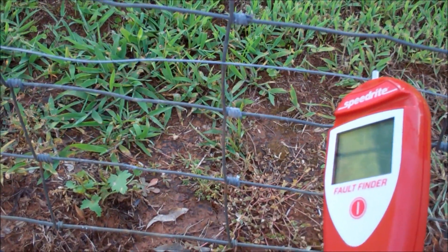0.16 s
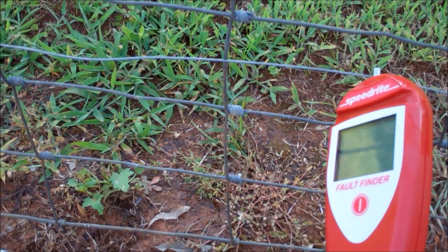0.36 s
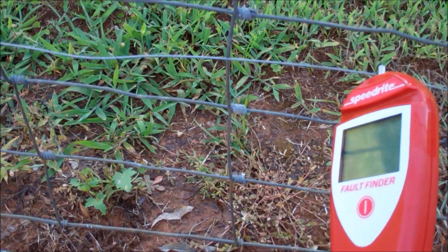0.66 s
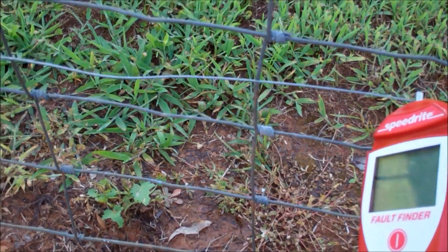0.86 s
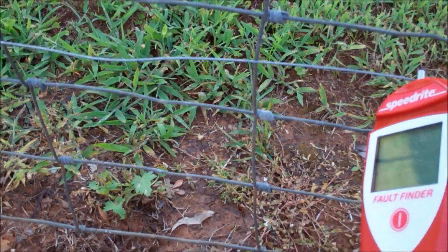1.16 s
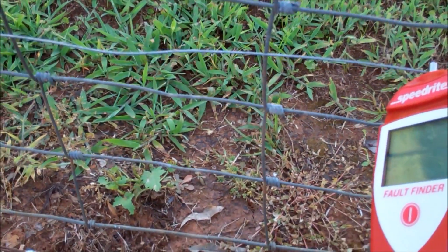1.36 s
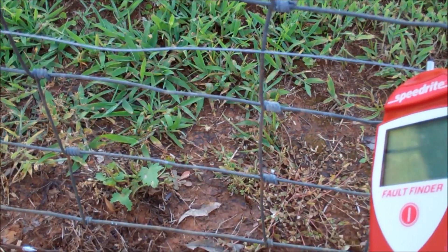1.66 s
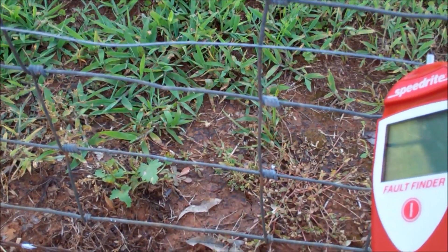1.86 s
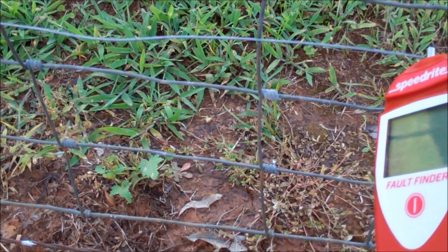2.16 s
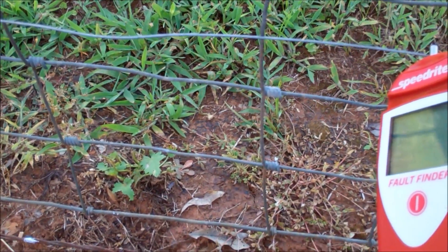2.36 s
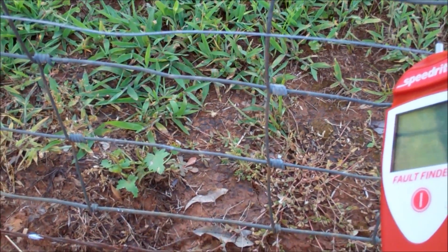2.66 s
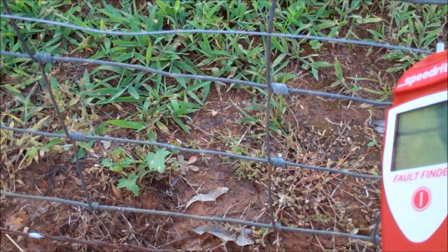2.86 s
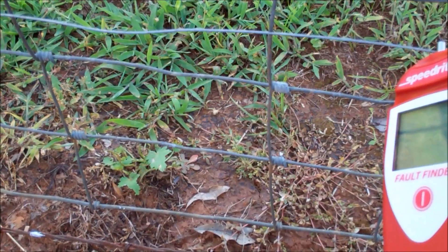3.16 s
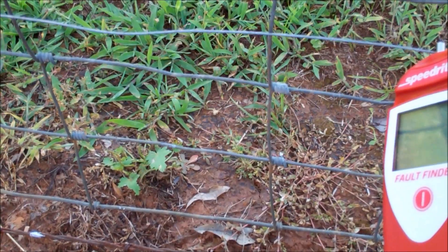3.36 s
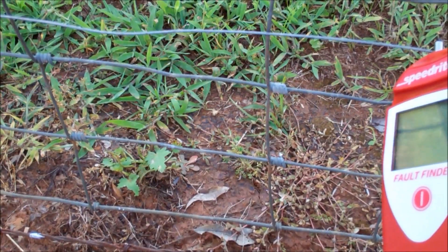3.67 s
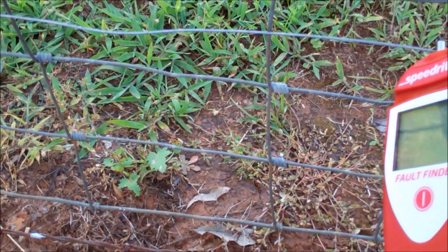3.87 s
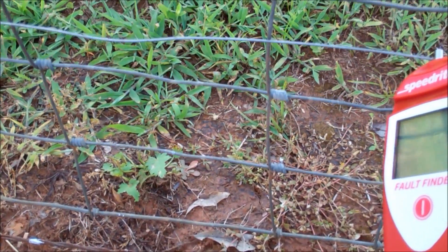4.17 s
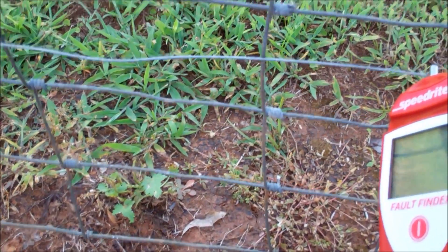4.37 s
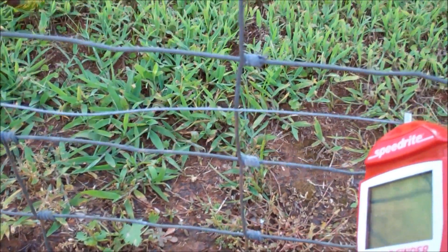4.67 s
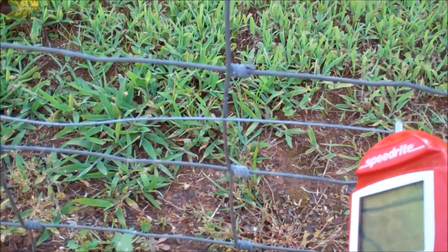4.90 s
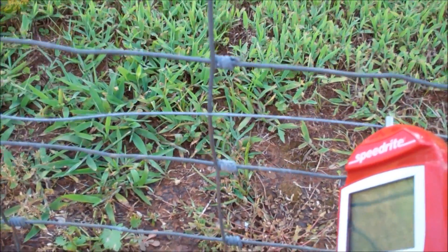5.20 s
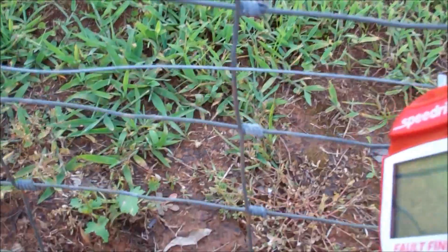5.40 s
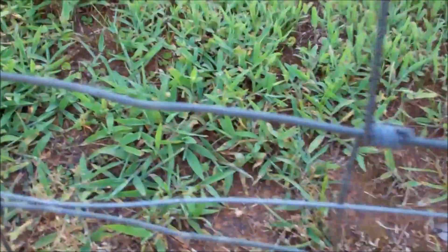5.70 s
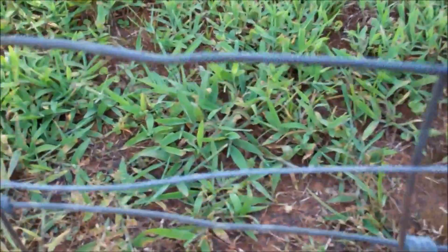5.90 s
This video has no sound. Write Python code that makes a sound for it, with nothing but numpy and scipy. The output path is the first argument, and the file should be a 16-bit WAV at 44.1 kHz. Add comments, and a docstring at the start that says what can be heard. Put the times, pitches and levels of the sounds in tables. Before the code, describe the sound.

In a grassy field, a nearby katydid keeps up a thin, very high trill among pulsing insect rasps and a soft hum of distant traffic. Four evenly spaced electric snaps from a wire fence cut through, the third and fourth jolting the hand-held microphone with a hard pop. From about two seconds in, a distant bird whistles hoarse, falling notes, and a few light clicks follow the last snap.

```python
"""A sharp electric crack over a trilling katydid: a fence sparks about every second and a half in a meadow
at dusk. Two pulses only crack; two also jolt the hand-held microphone's electronics, and the gain control
ducks. The katydid, close by, rubs a high tone from its wings, and other insects rasp with theirs.
Far off, a bird gives hoarse falling whistles over an insect chorus and the hum of traffic."""
import sys
import numpy as np
from scipy import signal
from scipy.fft import rfft, irfft, next_fast_len
from scipy.io import wavfile
from scipy.ndimage import uniform_filter1d, minimum_filter1d

SR = 44100
rng = np.random.default_rng(int(sys.argv[2]) if len(sys.argv) > 2 else 0)


def dump(signal):
    """Clip the signal to [-1, 1] and save it as 16-bit WAV at the path in sys.argv[1]."""
    limited = np.clip(np.atleast_2d(signal).T, -1, 1)
    pcm = np.round(limited * 32767).astype(np.int16)
    wavfile.write(sys.argv[1], SR, pcm)


N = 266431

# The colour of a crack at the microphone. Each row: frequency in Hz, relative level in dB.
CRACK_SPECTRUM = [(300, -36), (800, -30), (1470, -19), (1970, -11), (3330, -12), (4800, -8), (6310, -6),
                  (8000, -6), (10500, 0), (13800, -1), (15000, -16)]
# Sparks on the fence. Each row: start in seconds, left and right level in dB, ground echo in dB,
# lift below 3 kHz in dB.
SPARKS = [(0.2556, -9, -11, 1, -1), (1.8347, -9, -11.5, -15, 1), (3.4140, 0, -5, -5.5, -0.5),
          (4.9932, -4.5, -5, -3.5, 4.5)]
def fence_cracks(decay_ms=0.4, echo_ms=1.7, scatter_ms=2.6, sizzle_ms=18):
    """Each spark is a short noise burst with a ground echo, a scattered tail and a faint sizzle."""
    cracks, size = np.zeros((2, N)), 2048
    ms, hz = np.arange(size) * 1000 / SR, np.fft.rfftfreq(size, 1 / SR)
    burst = np.exp(-ms / decay_ms)
    echo = np.roll(burst ** 2, int(echo_ms * SR / 1000))
    scatter = from_db(-12) * np.exp(-ms / scatter_ms)
    for start, left_db, right_db, echo_db, bass_db in SPARKS:
        fade = burst + from_db(echo_db) * echo + scatter
        hiss = unit_rms(band(rng.standard_normal((2, size)), hz=4900, width_hz=7000))
        sizzle = from_db(-29.5) * hiss * np.exp(-ms / sizzle_ms)
        colour = from_db(at_hz(CRACK_SPECTRUM, hz) + bass_db * (hz < 3000))
        noise = unit_rms(irfft(rfft(rng.standard_normal((2, size))) * colour, size))
        i = round(start * SR)
        cracks[:, i:i + size] += from_db([[left_db], [right_db]]) * (noise * fade + sizzle)
    return signal.sosfilt(signal.cheby2(6, 25, 14700, fs=SR, output="sos"), cracks)


# Fence pulses that get into the microphone's electronics. Each row: start in seconds, channel (0 is left),
# level in dB, length in ms, fall in ms, relative back swing, recovery in ms, share that recovers slowly.
JOLTS = [(3.41394, 0, 1.5, .82, .45, 1.05, 1.0, .2), (3.41422, 1, 5, .84, .35, 0.42, 1.5, .24),
         (4.99312, 0, -4, .96, .47, 1.05, 1.1, .17), (4.99335, 1, -13, 1.0, .45, 0.25, 1.9, .8)]
def preamp_jolts(hold_ms=0.9, slow_ms=7.0, dip_ms=0.28):
    """The fence current kicks the preamplifier one way; it swings back, holds and recovers."""
    jolts = np.zeros((2, N))
    for start, channel, level_db, length_ms, fall_ms, swing, recovery_ms, slow in JOLTS:
        since_ms = (np.arange(N) / SR - start) * 1000
        fall = np.clip((since_ms - length_ms) / fall_ms + .5, 0, 1)
        pulse = (since_ms >= 0) * (1 - fall)
        after_ms = np.maximum(since_ms - length_ms - hold_ms, 0)
        recovery = (1 - slow) * np.exp(-after_ms / recovery_ms) + slow * np.exp(-after_ms / slow_ms)
        dip = 0.4 * (since_ms < 0) * (since_ms > -dip_ms) * (channel == 1)   # the right side dips first
        jolts[round(channel)] += from_db(level_db) * (pulse - swing * fall * recovery - dip)
    return jolts


def fence(rail=0.97):
    """Cracks and jolts together saturate softly at the preamplifier's rails."""
    return rail * np.tanh((fence_cracks() + preamp_jolts()) / rail)


# The katydid close by, as the hand turns the microphone. Each row: time in seconds, level in dB,
# left over right in dB, ground echo in dB, lag at the left port in ms.
KATYDID_AT_MIC = [(0, -29.5, 1, -13, .12), (.6, -31, .5, -8, 0.11), (.95, -27, 2, -11, .13),
                  (1.2, -30, 3.5, -13.5, 0.12), (1.7, -31.5, 2.5, -9.5, 0.13), (2.1, -30.5, 0, -7, 0.12),
                  (3.2, -29.5, 1, -7, 0.12), (4.2, -30.5, 0.2, -7, 0.12), (4.9, -27.5, 0, -20, 0.12),
                  (5.03, -29, -2.5, -18.5, 0.11), (5.4, -29, 1, -13, 0.12), (5.7, -28.5, 0.5, -13, 0.13),
                  (6.1, -28.5, 1, -15, 0.13)]
# One wing stroke. Each row: time from its middle in ms, pitch in Hz, relative level in dB.
WING_STROKE = [(-4.2, 10500, -30), (-3, 10640, -6), (-1.8, 10830, -1), (-.3, 11080, 0), (.8, 11190, 0),
               (2.1, 11030, -1), (3, 10720, -4), (3.9, 10250, -9), (4.8, 9750, -14), (5.8, 9400, -30)]
# The strokes slip slowly behind the beat. Each row: time in seconds, lateness in ms.
STROKE_LATENESS = [(0, -.2), (2.6, 0), (6.1, 2.2)]
def katydid(strokes_per_s=75.235, first_stroke_s=.00711):
    """A tone that arches up and down in every wing stroke, heard directly and off the ground."""
    level_db, pan_db, echo_db, lag_ms = in_time(KATYDID_AT_MIC)
    late_s = in_time(STROKE_LATENESS)[0] / 1000
    strokes = (np.arange(N) / SR - late_s - first_stroke_s) * strokes_per_s
    ms = (strokes - np.round(strokes)) * 1000 / strokes_per_s
    knot_ms, pitch, shape_db = np.transpose(WING_STROKE)
    hz = np.interp(ms, knot_ms, pitch) + 12 * drift(5.7) + 31.8 * drift(300)
    gain = from_db(level_db + np.interp(ms, knot_ms, shape_db) + 0.77 * drift(75) + 0.76 * drift(390))
    phase = 2 * np.pi * np.cumsum(hz) / SR
    song = gain * np.sin(phase)
    lagged = gain * np.sin(phase - 2 * np.pi * hz * lag_ms / 1000)
    left = lagged + from_db(echo_db) * delayed(song, ms=3.887)
    right = song + from_db(echo_db) * delayed(song, ms=3.2)
    return np.array([left * from_db(pan_db / 2), right * from_db(-pan_db / 2)])


def rasps(times, length_ms, level_db, hz, width_hz, pan_db, alike, tail, sag_hz):
    """Bursts of dense tooth clicks ring in a wing resonance, each at its own strength, sagging in pitch."""
    t, gain, shift_hz = np.arange(N) / SR, np.zeros(N), np.zeros(N)
    for middle, rasp_db in zip(times, level_db + 1.6 * rng.standard_normal(len(times))):
        near = slice(max(0, int((middle - .2) * SR)), int((middle + .3) * SR))
        x = (t[near] - middle) * 2000 / length_ms   # -1 to 1 across the rasp
        gain[near] += from_db(rasp_db) * np.where(x < 0, np.exp(-x ** 4), np.exp(-np.abs(x) ** tail))
        shift_hz[near] -= sag_hz / 2 * x * (np.abs(x) < 1.5)
    shared, *per_side = rng.standard_normal((3, N)) * (rng.random((3, N)) < .1)
    teeth = np.sqrt(alike) * shared + np.sqrt(1 - alike) * np.array(per_side)
    ring = signal.hilbert(band(band(teeth, hz, width_hz), hz, width_hz), next_fast_len(N))[:, :N]
    sagging = np.real(ring * np.exp(2j * np.pi * np.cumsum(shift_hz) / SR))
    return gain * unit_rms(sagging) * from_db([[pan_db / 2], [-pan_db / 2]])


# A low rasper in the centre, long and uneven in pace. Each entry: middle of a rasp in seconds.
LOW_RASPS = [.085, .31, .499, .659, .828, 1.048, 1.227, 1.452, 1.616, 1.786, 1.946, 2.126, 2.29, 2.464,
             2.614, 2.878, 3.038, 3.223, 3.542, 3.751, 3.941, 4.19, 4.37, 4.53, 4.689, 4.879, 5.074, 5.278,
             5.493, 5.682, 5.917]
# A high rasper a little to the right, nearly even in pace. Each row: time in seconds, rasps so far.
HIGH_RASP_COUNT = [(.07, 0), (.63, 4), (1.83, 13), (2.105, 15), (2.9, 21), (3.335, 24), (3.75, 27),
                   (4.19, 30), (4.6, 33), (5.045, 36), (5.445, 39), (6.02, 43)]
# A short rasper joins on the right, about nine a second. Each entry: middle of a rasp in seconds.
SHORT_RASPS = [1.507, 1.615, 1.716, 1.95, 2.095, 2.205, 2.355, 2.461, 2.57, 2.669, 2.764, 2.864, 3.138,
               3.245, 3.345, 3.63, 3.75, 3.972, 4.085, 4.21, 4.405, 4.518, 4.63, 4.74, 4.85, 4.974, 5.265,
               5.4, 5.525, 5.71, 5.93, 6.026]
# A scratchy chirp further off. Each row: middle in seconds, level in dB.
FAR_CHIRPS = [(1.14, -54.5), (1.72, -51), (2.33, -56), (2.52, -64), (3.02, -49), (3.64, -51), (5.51, -54)]
def rasping_insects():
    """Four insects scrape their wings, each with its own pace and resonance."""
    knot_s, count = np.transpose(HIGH_RASP_COUNT)
    high_s = np.interp(np.arange(count[-1] + 1), count, knot_s)
    chirp_s, chirp_db = np.transpose(FAR_CHIRPS)
    low = rasps(LOW_RASPS, length_ms=52, level_db=-46.5, hz=9380, width_hz=730,
                pan_db=0, alike=0.065, tail=2.5, sag_hz=597)
    high = rasps(high_s, length_ms=36.3, level_db=-42.5, hz=10000, width_hz=520,
                 pan_db=-2, alike=0.32, tail=3.3, sag_hz=149)
    short = rasps(SHORT_RASPS, length_ms=20.8, level_db=-40.5, hz=9760, width_hz=610,
                  pan_db=-3, alike=0.22, tail=2.9, sag_hz=300)
    chirps = rasps(chirp_s, length_ms=90, level_db=chirp_db, hz=7260, width_hz=2300,
                   pan_db=-1, alike=0.19, tail=1.0, sag_hz=99)
    return low + high + short + chirps


# A bird far from the microphone. Each row: start in seconds, level in dB, length in seconds,
# first and last pitch in Hz.
BIRD_CALLS = [(2.166, -55, .42, 2950, 2790), (3.79, -50.5, 0.39, 3090, 2735),
              (4.444, -51, 0.41, 3035, 2830), (5.239, -49, 0.42, 3000, 2860)]
def bird():
    """Falling whistles with a weak octave, roughened by a flutter."""
    calls = np.zeros(N)
    flutter = from_db(5 * drift(150) + 3 * drift(30))
    waver_hz = 50 * drift(390) + 14 * drift(40)
    for start, level_db, length_s, from_hz, to_hz in BIRD_CALLS:
        progress = np.clip((np.arange(N) / SR - start) / length_s, 0, 1)
        phase = 2 * np.pi * np.cumsum(from_hz + (to_hz - from_hz) * progress ** 2 + waver_hz) / SR
        whistle = np.sin(phase) + from_db(-14) * np.sin(2 * phase)
        calls += from_db(level_db) * np.sin(np.pi * progress ** 0.6) * whistle * flutter
    return np.array([calls, delayed(calls, ms=0.12)])


# Hand and grass at the microphone. Each row: start in seconds, level in dB, centre in Hz, width in Hz.
HANDLING_TICKS = [(4.441, -38.5, 249, 300), (5.517, -24, 10000, 5990), (5.646, -31, 12000, 4000),
                  (5.809, -27.5, 2550, 3040)]
def ticks():
    """Single small clicks, each ringing in its own band."""
    out = np.zeros(N)
    for start, level_db, hz, width_hz in HANDLING_TICKS:
        click = band(signal.unit_impulse(1500), hz, width_hz)
        i = round(start * SR)
        out[i:i + len(click)] -= from_db(level_db) * click / np.abs(click).max()
    return out


# One thin insect tone far off, fading away. Each row: time in seconds, level in dB.
THIN_TONE_FADE = [(0, -67), (.6, -68), (.95, -71), (1.3, -90), (6.1, -95)]
def thin_insect(hz=7760, width_hz=240):
    """Noise rings in a narrow wing resonance."""
    ring = band(band(rng.standard_normal((2, N)), hz, width_hz), hz, width_hz)
    return from_db(in_time(THIN_TONE_FADE)[0]) * unit_rms(ring)


# Insects far across the meadow. Each row: frequency in Hz, relative level in dB.
CHORUS_SPECTRUM = [(6000, -33), (8300, -20), (9500, -4), (10300, -7), (11000, -5), (11400, -4),
                   (11700, -13), (11950, -10), (13000, -8), (13700, -4), (14170, -1), (14230, -26),
                   (14450, -60), (16000, -60)]
def insect_chorus():
    """Many far insects blur into a high, slightly wavering hiss."""
    return from_db(-45 + 0.92 * drift(11)) * ambience(CHORUS_SPECTRUM)


# Traffic and leaves in the distance. Each row: time in seconds, level in dB.
TRAFFIC_LEVEL = [(0, -48), (.7, -49), (3.2, -51), (4.7, -50), (6.1, -51)]
# Their colour at the microphone. Each row: frequency in Hz, relative level in dB.
TRAFFIC_SPECTRUM = [(15, -38.5), (25, -23), (95, -4), (112, -4.5), (122, 2), (133, -6), (364, -17.5),
                    (650, -19), (953, -14.5), (1150, -13), (1900, -14), (2370, -16.5), (3540, -18.5),
                    (6210, -21.5), (8000, -19), (14200, -41.5), (14450, -81.5)]
def traffic_and_leaves():
    """Distant traffic and leaves merge into a low hum under a soft hiss."""
    return from_db(in_time(TRAFFIC_LEVEL)[0] + drift(8)) * ambience(TRAFFIC_SPECTRUM)


# How alike the two microphone ports hear the background. Each row: frequency in Hz, correlation.
PORT_LIKENESS = [(60, 0.89), (130, 1), (290, 0.64), (630, 0.61), (1380, 0.49), (3030, -0.038), (6650, 0.13),
                 (14600, -0.22)]
# Which way the background leans. Each row: frequency in Hz, left over right in dB.
PORT_BALANCE = [(60, -2), (700, -1.5), (2340, -2), (4300, 0), (8000, -0.5), (11000, 1), (13000, -6.5)]
def ambience(spectrum):
    """Stereo noise of a given colour, alike in the bass and nearly unrelated in the treble."""
    hz, sides = np.fft.rfftfreq(N, 1 / SR), np.array([[1], [-1]])
    mid, side = rfft(rng.standard_normal((2, N)))
    alike = at_hz(PORT_LIKENESS, hz)
    ports = np.sqrt(1 + alike) * mid + np.sqrt(1 - alike) * side * sides
    colour = from_db(at_hz(spectrum, hz) + sides * at_hz(PORT_BALANCE, hz) / 2)
    return unit_rms(irfft(ports * colour, N))


def from_db(db):
    """Decibels to gain."""
    return 10 ** (np.asarray(db) / 20)


def unit_rms(x):
    """Scale to unit rms."""
    return x / np.sqrt(np.mean(x ** 2) + 1e-20)


def in_time(rows):
    """Columns of a curve table at every sample."""
    seconds, *columns = np.transpose(rows)
    return [np.interp(np.arange(N) / SR, seconds, column) for column in columns]


def at_hz(rows, hz):
    """Read a spectrum table on a log-frequency axis."""
    knot_hz, values = np.transpose(rows)
    return np.interp(np.log(hz + 1), np.log(knot_hz), values)


def drift(knots_per_s):
    """A wandering line through random knots of spread 1."""
    knots = rng.standard_normal(2800)
    return np.interp(np.arange(N) / SR * knots_per_s, np.arange(len(knots)), knots)


def band(x, hz, width_hz):
    """Band-pass around a centre."""
    edges = np.clip([hz - width_hz / 2, hz + width_hz / 2], 30, 19000)
    return signal.sosfilt(signal.butter(2, edges, "band", fs=SR, output="sos"), x)


def delayed(x, ms):
    """A delay finer than one sample, made by turning the phase."""
    hz = np.fft.rfftfreq(N, 1 / SR)
    return irfft(rfft(x) * np.exp(-2j * np.pi * hz * ms / 1000), N)


def scene():
    """The meadow at the two microphone ports."""
    background = traffic_and_leaves() + insect_chorus()
    insects = katydid() + rasping_insects()
    return fence() + insects + bird() + thin_insect() + ticks() + background


def gain_control(x, threshold_db=-19, slope=2.2, max_cut_db=15, attack_ms=4, hold_ms=140, release_db_s=56):
    """Loud sound pulls the gain down within milliseconds; it holds, then creeps back at a steady rate."""
    power = uniform_filter1d(np.mean(x ** 2, axis=0), size=400, origin=199)
    over_db = np.maximum(10 * np.log10(power + 1e-12) - threshold_db, 0)
    gain_db = -max_cut_db * np.tanh(slope * over_db / max_cut_db)
    ramp, hold = release_db_s * np.arange(N) / SR, int(hold_ms * SR / 1000)
    held_db = minimum_filter1d(gain_db, size=hold, origin=(hold - 1) // 2)
    released_db = np.minimum.accumulate(held_db - ramp) + ramp
    late_db = np.roll(released_db, 130)   # the first 3 ms of a crack slip through
    pole = np.exp(-1000 / (attack_ms * SR))
    return x * from_db(signal.lfilter([1 - pole], [1, -pole], late_db))


# Moments when the treble narrows to the centre. Each row: start and end in seconds.
NARROW_SPANS = [(0.3, 0.58), (2.48, 2.59), (3.45, 3.86), (5.02, 5.18)]
def record(dry, coupling_hz=3.2, cutoff_hz=14950):
    """The hand-held recorder: gain control, coupling high-pass, narrowing treble, clipping and top cut."""
    x = signal.sosfilt(signal.butter(1, coupling_hz, "high", fs=SR, output="sos"), gain_control(dry))
    t = np.arange(N) / SR
    narrow = uniform_filter1d(sum((t > start) * (t < end) * 1. for start, end in NARROW_SPANS), size=800)
    treble = signal.sosfiltfilt(signal.butter(4, [4600, 12200], "band", fs=SR, output="sos"), x)
    x[1] += narrow * (from_db(1.06) * treble[0] - treble[1])   # the right side takes the left's treble
    return signal.sosfilt(signal.ellip(8, .5, 60, cutoff_hz, fs=SR, output="sos"), np.clip(x, -1, 1))


dry = scene()
out = record(dry)
dump(out)
```